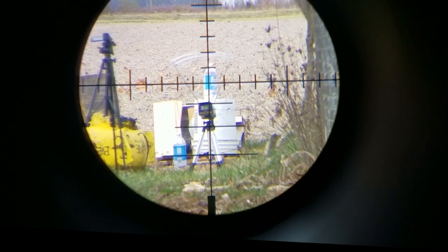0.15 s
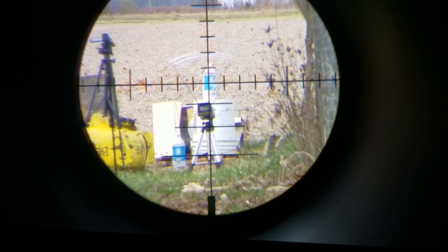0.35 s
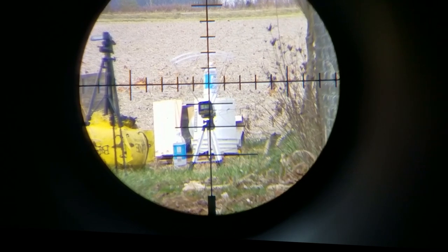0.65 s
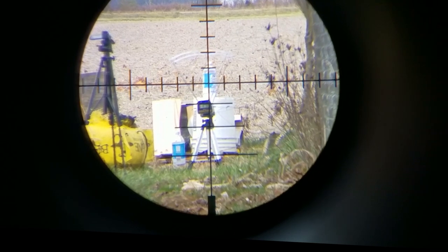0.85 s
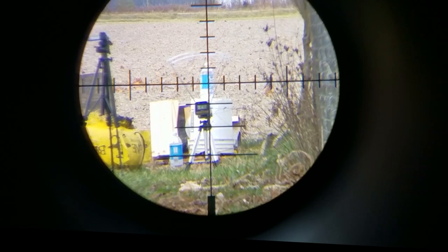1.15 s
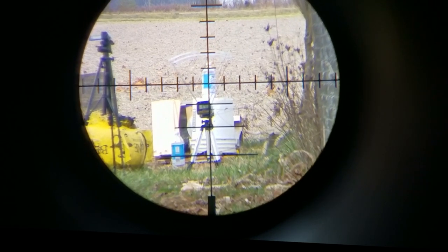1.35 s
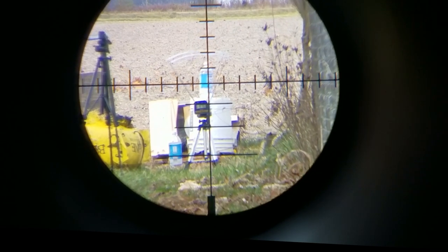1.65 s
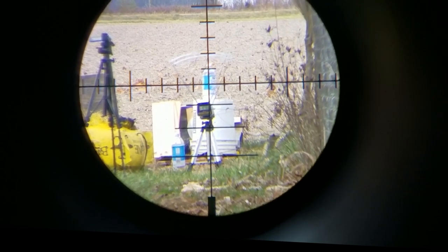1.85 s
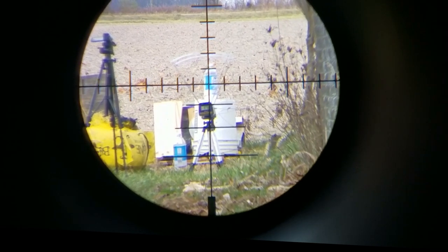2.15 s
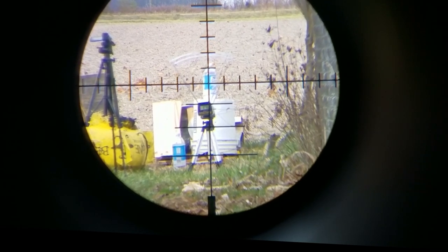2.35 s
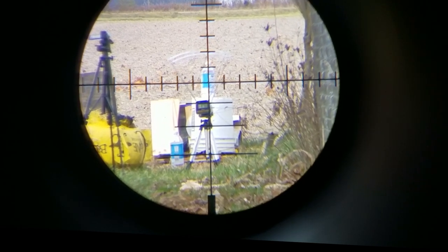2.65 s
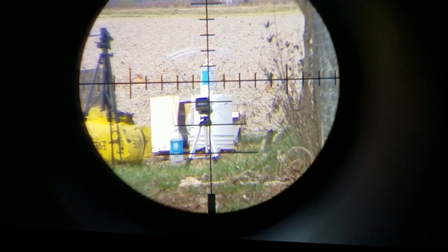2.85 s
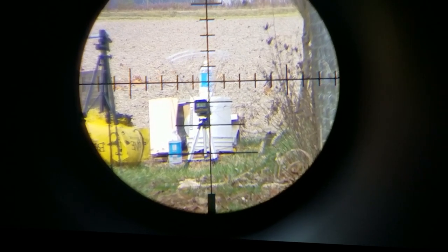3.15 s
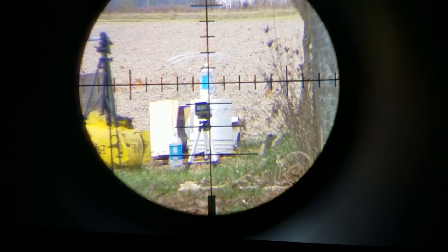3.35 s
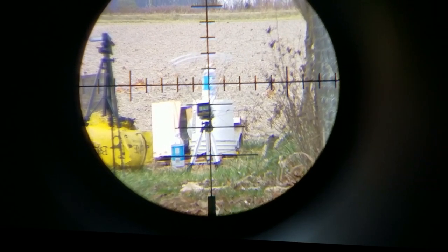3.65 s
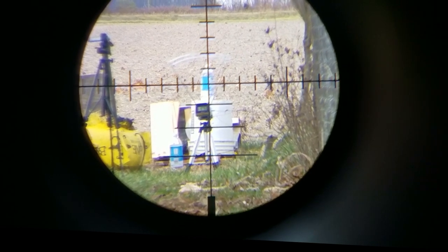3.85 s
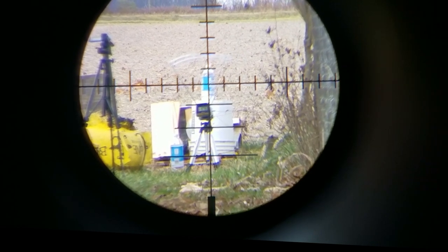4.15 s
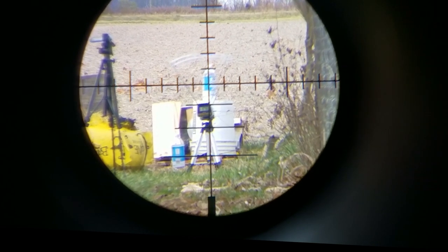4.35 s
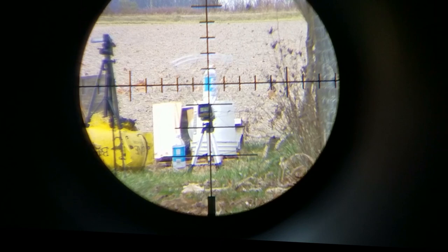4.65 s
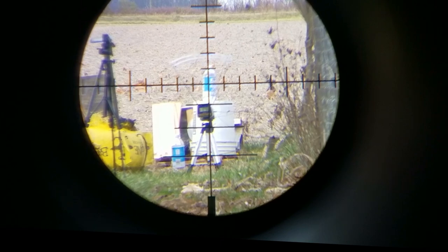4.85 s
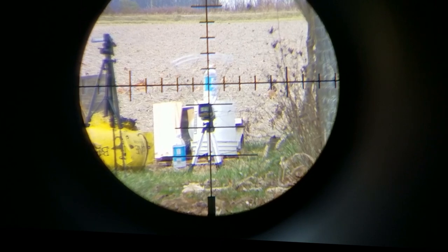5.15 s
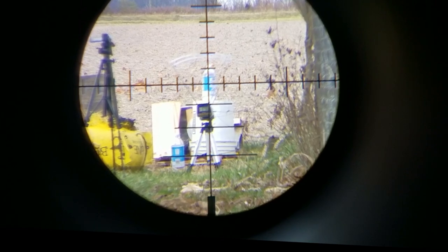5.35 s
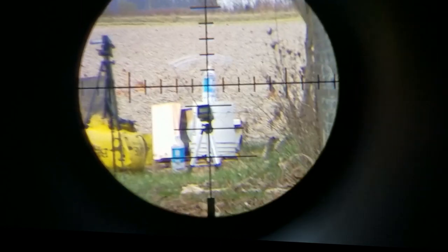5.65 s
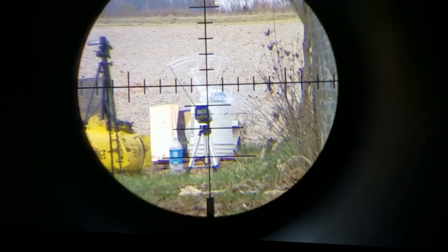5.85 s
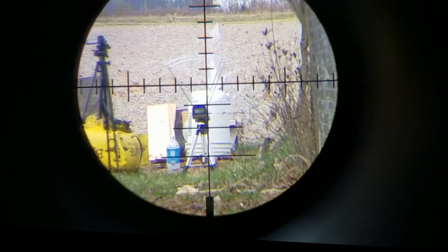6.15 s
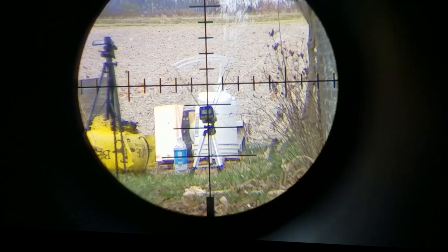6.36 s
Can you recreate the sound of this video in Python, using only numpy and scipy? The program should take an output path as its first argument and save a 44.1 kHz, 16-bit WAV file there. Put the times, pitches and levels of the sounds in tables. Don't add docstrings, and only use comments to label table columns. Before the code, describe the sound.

Steady low engine hum in open country, small clicks and wind bumps, then a sudden clipped air gun blast, quick echoes and a hollow pop downrange.

```python
import sys
import numpy as np
from scipy import signal
from scipy.fft import rfft, irfft
from scipy.io import wavfile
from scipy.ndimage import uniform_filter1d

SR = 44100
rng = np.random.default_rng(int(sys.argv[2]) if len(sys.argv) > 2 else 0)


def transcribe(u):
    v = np.clip(np.atleast_2d(u).T, -1, 1)
    q = np.round(v * 32767).astype(np.int16)
    wavfile.write(sys.argv[1], SR, q)


def volts(x):
    e = np.asarray(x, float) / 20
    return 10 ** e


N = 286650
TIME = np.arange(N) / SR

# frequency in Hz, level in dB.
HISS_COLOUR = [(820, -8), (1400, -2.5), (1550, -3), (1800, -3.5), (2160, -6.5), (6250, -18), (7970, -21),
               (9960, -21), (15100, -12), (15700, -14)]
# start in seconds, length in seconds, pitch in Hz, level in dB rms.
BIRD_PEEPS = [
    (.01, .05, 5100, -83),
    (.66, .14, 5150, -82.5),
    (1.91, 0.092, 4850, -82),
    (2.09, 0.033, 6200, -79),
    (3.25, .04, 6300, -83),
    (5.33, 0.091, 4970, -87),
]
# time in seconds, 8th order in Hz, labour in the orders just above it in dB.
THROTTLE_CURVE = [(0.0, 177, -51), (0.1, 175.5, -55.5), (0.7, 175.5, -50.5), (2.06, 175.7, -57.5),
                  (2.25, 174.5, -61), (4.2, 174.3, -59.5), (5.4, 174.1, -68), (6.15, 174.5, -62),
                  (6.5, 174, -58)]
# time in seconds, 8th order in dB, upper orders in dB,
# brightness in dB.
AIR_CARRIAGE = [(0.03, -47.5, -50, 2.5), (0.33, -47, -55, -5.5), (0.7, -44.5, -49, -8),
                (1.25, -48, -54.5, 5.5), (1.8, -43, -48.5, -7.5), (2.06, -42.5, -44.5, 7),
                (2.43, -42.5, -52, 6), (2.57, -44.5, -47, 11.5), (3.0, -39, -50, -5), (3.33, -38, -48.5, 4),
                (3.55, -40, -51, -10), (4.1, -41.5, -52.5, -1), (4.78, -38.5, -44, -1),
                (5.05, -43.5, -55, -3.5), (5.34, -48.5, -48.5, -4.5), (5.8, -48.5, -48.5, 2.2),
                (6.15, -45.5, -45, -4.5), (6.5, -40, -40.5, -4)]
# multiple of the cycle rate, level in dB.
FIRING_ORDERS = [(4, -10.5), (8, 0), (12, -11.5), (16, -1.5), (20, -6), (24, -13), (28, -8.5), (32, -12.5),
                 (36, -23), (40, -22.5), (44, -51.5)]
# multiple of the cycle rate, level in dB.
WEAK_ORDERS = [(1, -40), (2, -22.5), (10, -19.5), (30, -22), (39, -24.5), (43, -58)]
# multiple of the cycle rate, level in dB.
PIPE_ORDERS = [(13, -33), (14, -33), (15, -10), (17, -13), (18, -29.5), (19, -12), (26, -34.5), (31, -12),
               (33, -36), (34, -33.5)]
# frequency in Hz, level in dB per Hz.
EXHAUST_COLOUR = [(88, -30.5), (150, -7.5), (188, -6.5), (232, -17), (340, -2.5), (431, -6), (553, -14),
                  (683, -8.5), (866, -19.5), (962, -25), (1330, -26.5), (1480, -43), (2500, -50),
                  (4000, -81)]
# start in seconds, peak in dB, hold in seconds.
WIND_GUSTS = [(0.0, -65, .01), (0.4, -71, .01), (1.7, -70, .4), (2.192, -55, .1), (2.318, -46, 0.0092),
              (2.438, -49, 0.011), (2.507, -47, .27), (2.966, -57, .02), (3.245, -50, .01),
              (3.305, -47, .01), (3.46, -59, 0.14), (3.72, -56, 0.022), (3.94, -57, .01), (4.2, -66, .04),
              (4.4, -69, .05), (4.8, -62, .06), (5.297, -54.5, .01)]
# frequency in Hz, level in dB.
WIND_COLOUR = [(4, -12), (20, -9.5), (80, 5), (166, -1), (242, -1), (362, -13), (455, -19.5), (500, -17),
               (650, -48.5), (1100, -120)]
# start in seconds, peak in dB,
# centre in Hz, t60 in seconds, left minus right in dB.
IMPACTS = [(1.781, -39, 3270, 0.024, 0), (1.779, -40, 1790, 0.037, 5), (1.78, -32, 1050, 0.037, -3),
           (2.255, -48, 2000, 0.055, 6), (2.257, -46, 3000, .03, 2), (2.966, -40, 3830, 0.02, 0),
           (5.516, 9.5, 2890, 0.031, -8), (5.5237, -4, 12300, 0.042, -9), (5.524, 1.5, 1760, 0.041, 2),
           (5.538, 0.5, 900, 0.11, -1), (5.548, 2, 2920, 0.054, -5), (5.548, 5.5, 4570, 0.015, 10),
           (5.56, 4.5, 3000, 0.056, -3), (5.606, 2, 2110, 0.23, -1), (5.81, -23, 3600, 0.038, 0),
           (5.815, -18, 1760, 0.085, 0), (5.818, -29, 5930, 0.043, 2), (5.818, -40, 10500, 0.039, -7),
           (5.818, -35, 14500, .04, -4), (6.345, -53.5, 2870, 5.2, -5), (6.4925, -39.5, 6500, .2, -9.5),
           (6.4915, -54.5, 9520, .2, -8), (6.49, -43, 1200, .2, 1.5)]
# time in seconds, level in dB.
METAL_BLOWS = [
    (5.51, -11),
    (5.517, -3),
    (5.538, -7),
    (5.548, 0),
]
# frequency in Hz, level in dB, t60 in seconds,
# left weight, right weight.
LONG_MODES = [(357, -2.5, 0.6, 0.88, 0.69), (366, -3.5, 0.99, 0.7, -0.54), (463, -38.5, 4.4, 1, -0.7),
              (714.5, -19, 1.6, 0.26, 0.05), (713, -22, 1.8, -0.99, -0.02), (1007, -6, 0.41, 1, -1.4),
              (1034.5, -11, 0.61, 1, -0.5), (3780, -25, .6, 0.99, .5), (4350, -35, .9, 0.89, .6),
              (4404, -37.5, 0.73, 0.94, -.5)]
# frequency in Hz, level in dB, t60 in seconds.
SHORT_MODES = [(1090, -10, .4), (1500, -12, 0.39), (1360, -10, 0.47), (1680, -7.5, 1), (2080, -3.5, 0.38),
               (2266, -11, 0.17), (2537, -8, 0.16), (2660, -15, 0.4), (2799, -15.5, 0.5), (3000, -7, 0.61),
               (3500, -16.5, 0.25), (4404, -17, 0.33), (4360, -7, 0.29), (5660, -12.5, 0.22),
               (8100, -30, 0.24), (9000, -36, 0.41)]
# time in seconds, level in dB.
BLAST_CURVE = [
    (5.506, -74),
    (5.5095, -51.5),
    (5.511, -13),
    (5.5155, -16),
    (5.517, -2.5),
    (5.53, -3.5),
    (5.55, -5.5),
    (5.557, -17),
    (5.6, -42),
]
# frequency in Hz, level in dB.
BLAST_SPECTRUM = [(24, -40.5), (40, -13.5), (140, -10.5), (487, 3.5), (865, -8.5), (1000, 1), (1500, -8.5),
                  (1660, -1), (2940, -6.5), (8000, -15), (8620, -16.5), (12900, -10.5), (15700, -8.5)]
# frequency in Hz, level in dB.
NEAR_SPECTRUM = [(50, -71), (110, -43), (173, -19), (258, -18.5), (520, -13.5), (929, -17), (1500, -15.5),
                 (2100, -15), (2900, -19.5), (3900, -24.5), (5600, -29.5), (6150, -21), (7250, -55.5),
                 (8600, -55), (10300, -39), (15700, -41.5)]
# time in seconds, drop in dB, added loss in dB per second.
SURFACES_END = [
    (5.587, 3, 3.9),
    (5.734, 10.5, 92),
]
# time in seconds, level in dB.
FAR_CURVE = [
    (5.65, -75),
    (5.75, -29.5),
    (5.85, -41),
    (6.0, -45.5),
    (6.1, -53),
    (6.22, -63),
    (6.34, -57.5),
    (6.6, -57),
]
# frequency in Hz, level in dB.
FAR_SPECTRUM = [(530, -25.5), (900, 2.5), (1260, -6), (1820, -2), (3520, -17), (4520, -20), (6960, -31),
                (7390, -39), (12400, -34), (15700, -63.5)]
# time in seconds, gain in dB.
GAIN_CURVE = [
    (5.517, -2.5),
    (5.56, -11.5),
    (6.05, -14.5),
    (6.2, -14),
    (6.32, -11.5),
    (6.5, -6),
]


def rms_one(x):
    return x / np.sqrt(np.mean(x ** 2) + 1e-20)


def in_time(rows):
    s, *columns = np.transpose(rows)
    return [np.interp(TIME, s, column) for column in columns]


def drift(rate, count=1, size=1):
    r = np.exp(-40 * np.pi * rate / SR)
    noise = rng.standard_normal((count, N // 20 + 4002))
    slow = signal.lfilter([1], [1, -2 * r, r * r], noise)[:, 4000:]
    at = np.arange(0, N, size) / 20
    return np.array([np.interp(at, np.arange(len(v)), rms_one(v)) for v in slow])


def opposed(pan_db):
    return np.array([[pan_db], [-pan_db]]) / 2


def stereo(shared, own, alike):
    alike = np.clip(alike, -1, 1)
    return np.sqrt(1 + alike) * shared + np.sqrt(1 - alike) * own * [[1], [-1]]


def coloured(spectrum, alike):
    hz, level_db = np.transpose(spectrum)
    grid = np.maximum(np.fft.rfftfreq(N, 1 / SR), 1)
    shape = volts(np.interp(np.log(grid), np.log(hz), level_db, left=-90, right=-90))
    shared, own = irfft(rfft(rng.standard_normal((2, N))) * shape, N)
    return rms_one(stereo(shared, own, alike))


def ring(clicks, hz, t60):
    r, w = volts(-60 / (t60 * SR)), 2 * np.pi * hz / SR
    return signal.lfilter([0, np.sin(w)], [1, -2 * r * np.cos(w), r * r], clicks + 1e-18)


def hiss():
    return volts(-64) * coloured(HISS_COLOUR, alike=0.029)


def birds():
    out = np.zeros(N)
    for s, length, hz, level_db in BIRD_PEEPS:
        age = TIME - s
        share = np.clip(age / length, 0, 1)
        swell = np.sin(np.pi * share) ** .5
        trill = 1 + 0.65 * np.cos(2 * np.pi * 33 * age)
        whistle = np.sin(2 * np.pi * hz * age * (1 - .003 * share))
        out += volts(level_db + 6) * swell * trill * whistle
    return out


def order_levels():
    orders = np.arange(1, 45)
    levels = dict(zip(orders, np.interp(orders, *np.transpose(WEAK_ORDERS))))
    return {**levels, **dict(FIRING_ORDERS), **dict(PIPE_ORDERS)}.items()


def engine_orders(cycle, flutter_db, wander, skew):
    coarse = 10
    levels = order_levels()
    air = drift(3.14, count=2 * len(levels), size=coarse).reshape(2, -1, N // coarse)
    fades, slips = 1.6 * uniform_filter1d(air, size=3, axis=1)
    groups, power = np.zeros((4, 2, N // coarse)), np.zeros((4, N // coarse))
    for (k, level_db), fade, slip in zip(levels, fades, slips):
        phase = k * cycle[::coarse] + skew * k * k + wander * k * slip
        sides = np.array([phase, phase + 0.014 * k + 0.0027 * k * fade])
        group = np.searchsorted([9, 13, 21], k)
        size = (k != 8) * volts(level_db + flutter_db * np.sqrt(k) * fade)
        groups[group] -= size * np.cos(sides)
        power[group] += size ** 2 / 2
    groups[1:] /= np.sqrt(power[1:, None])
    return signal.resample_poly(groups, coarse, 1, axis=2)


def exhaust(cycle, upper_db, bright_db):
    firing = 1 + .4 * np.cos(4 * cycle)
    level_db = -48.5 + .6 * (upper_db + 50.5) + .03 * bright_db
    return volts(level_db) * firing * coloured(EXHAUST_COLOUR, alike=0.85)


def engine(flutter_db, wander, skew, shimmer_db):
    hz, low_db = in_time(THROTTLE_CURVE)
    main_db, upper_db, bright_db = in_time(AIR_CARRIAGE)
    cycle = 2 * np.pi * np.cumsum(hz) / 8 / SR
    deep_orders, *upper_orders = engine_orders(cycle, flutter_db, wander, skew)
    shimmer = shimmer_db * drift(5.0, count=4)
    deep = volts(-42.5 + 0.42 * (main_db + 43.5)) * deep_orders
    main = np.sqrt(2) * volts(main_db + .35 * shimmer[0]) * np.cos(8 * cycle + [[0], [.2]])
    out = deep + main + exhaust(cycle, upper_db, bright_db)
    levels = (low_db + 1.5, upper_db - bright_db / 2, upper_db + bright_db / 2)
    for level_db, eddy_db, orders in zip(levels, shimmer[1:], upper_orders):
        out += volts(level_db + eddy_db) * orders
    return out


def wind(lumpy_db):
    swell, ebb = 151, 278
    gust_db = np.full(N, -81.0)
    for s, peak_db, hold in WIND_GUSTS:
        away_db = np.maximum(swell * (s - TIME), ebb * (TIME - s - hold))
        gust_db = np.maximum(gust_db, peak_db - np.maximum(away_db, 0))
    level_db = -50.5 + 0.79 * (gust_db + 56.5) + lumpy_db * drift(7.6, count=2)
    return volts(level_db) * coloured(WIND_COLOUR, alike=.1)


def can():
    click = np.zeros(N)
    click[round(5.806 * SR)] = volts(-31)
    return ring(click, hz=264.4, t60=0.36) * volts(opposed(6))


def ticks():
    out = np.zeros((2, N))
    for s, peak_db, hz, t60, pan_db in IMPACTS:
        i = round(s * SR)
        age = np.arange(min(SR // 5, N - i)) / SR
        band = signal.butter(2, [hz * .82, hz * 1.06], "band", fs=SR, output="sos")
        burst = rms_one(signal.sosfilt(band, rng.standard_normal((2, SR // 5))))[:, :len(age)]
        level_db = peak_db - 9 - 60 * age / t60 + opposed(pan_db)
        out[:, i:i + len(age)] += burst * volts(level_db)
    return out


def metal(short_db):
    at = [round(s * SR) for s, db in METAL_BLOWS]
    blow = volts(np.array(METAL_BLOWS)[:, 1])
    out = np.zeros((2, N))
    for hz, level_db, t60, left, right in LONG_MODES:
        clicks = np.zeros(N)
        clicks[at[-1]] = volts(level_db)
        out += ring(clicks, hz, t60) * np.array([[left], [right]])
    for hz, level_db, t60 in SHORT_MODES:
        clicks = np.zeros((2, N))
        clicks[:, at] = blow * volts(level_db + short_db) * rng.standard_normal((2, len(at)))
        out += ring(clicks, hz, .7 * t60)
    return out


def near_level():
    first, full, full_db = 5.52, 5.55, -1.5
    level_db = np.interp(TIME, [first, full], [full_db - 43, full_db], left=-200)
    level_db = level_db - 33.5 * np.maximum(TIME - full, 0)
    for s, drop_db, loss_db in SURFACES_END:
        step = np.clip((TIME - s) / .011 + .5, 0, 1)
        level_db = level_db - drop_db * step - loss_db * np.maximum(TIME - s, 0)
    return level_db


def patchy(x, patchy_db, dulling_db):
    edges = 100 * 2 ** np.arange(0, 7.4, 1 / 3)
    age = TIME[-x.shape[1]:] - 5.65
    swells_db = patchy_db * drift(21.0, count=len(edges))[:, -len(age):]
    gains = volts(swells_db - dulling_db * np.outer(edges / 10000, age))
    out = np.zeros(x.shape)
    for gain, low, high in zip(gains, edges, edges[1:]):
        band = signal.butter(2, [low, high], "band", fs=SR, output="sos")
        out += gain * signal.sosfilt(band, x)
    return out


def rough_noise(level_db, spectrum, rough_db, pan_db):
    grain_db = rough_db * drift(150, count=2)
    return volts(level_db + grain_db + opposed(pan_db)) * coloured(spectrum, alike=0.)


def report():
    blast_db = np.interp(TIME, *np.transpose(BLAST_CURVE), left=-200, right=-200)
    far_db = np.interp(TIME, *np.transpose(FAR_CURVE), left=-200, right=-200)
    blast = rough_noise(blast_db, BLAST_SPECTRUM, rough_db=2.5, pan_db=-.4)
    near = rough_noise(near_level(), NEAR_SPECTRUM, rough_db=2.5, pan_db=-.8)
    far = rough_noise(far_db, FAR_SPECTRUM, rough_db=1.2, pan_db=-3)
    near[:, -SR:] = patchy(near[:, -SR:], patchy_db=1.85, dulling_db=35.5)
    return blast + near + far


def scene():
    drone = engine(flutter_db=0.75, wander=0.053, skew=0.0121, shimmer_db=1.5)
    background = hiss() + birds() + drone + wind(lumpy_db=3.0)
    return background + can() + ticks() + metal(short_db=-13.0) + report()


def low_pass(x):
    return signal.sosfilt(signal.butter(12, 15850, fs=SR, output="sos"), x)


def record(dry):
    ducked = dry * volts(in_time(GAIN_CURVE)[0])
    offset = ducked - volts(-65)
    return low_pass(np.clip(offset, -.96, .96))


dry = scene()
out = record(dry)
transcribe(out)
```